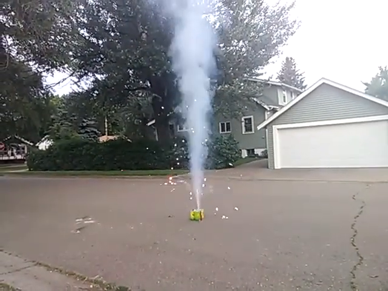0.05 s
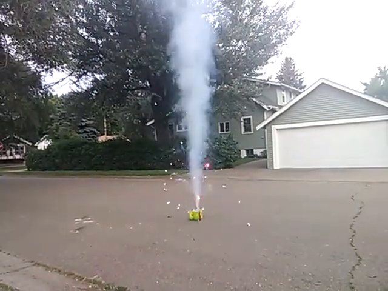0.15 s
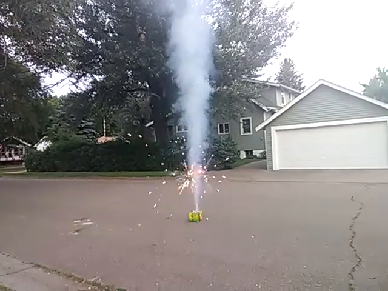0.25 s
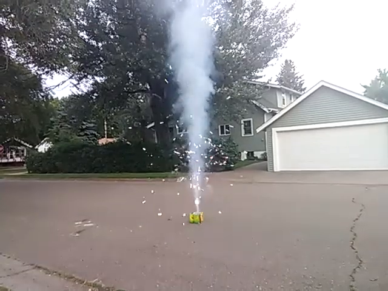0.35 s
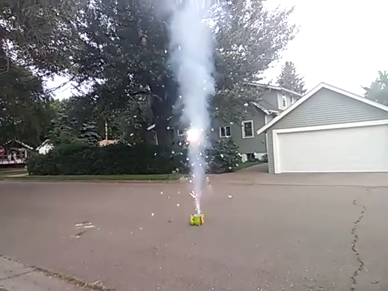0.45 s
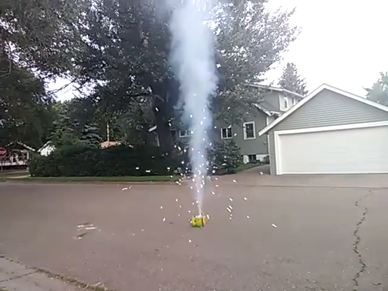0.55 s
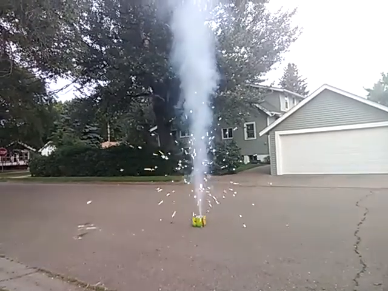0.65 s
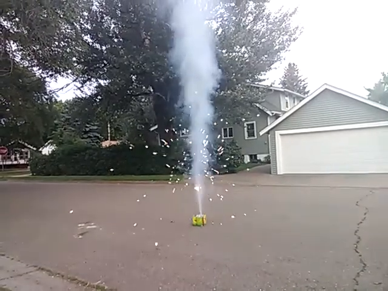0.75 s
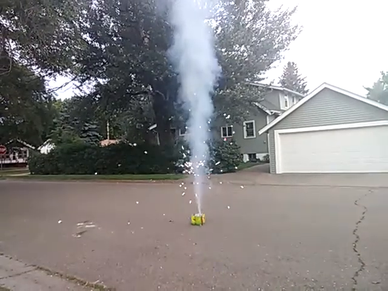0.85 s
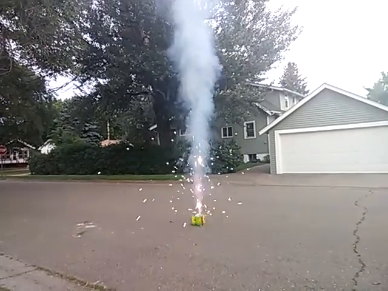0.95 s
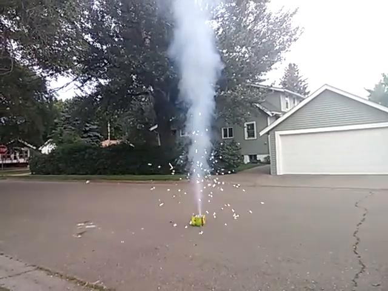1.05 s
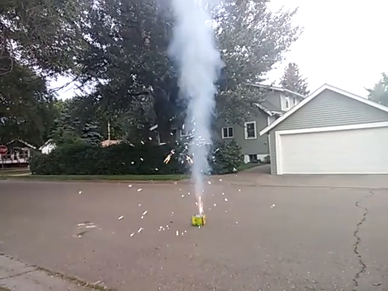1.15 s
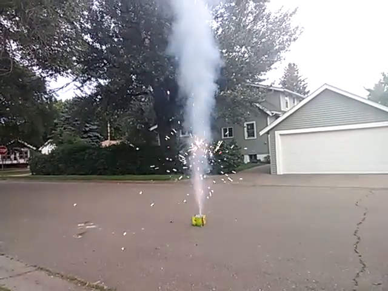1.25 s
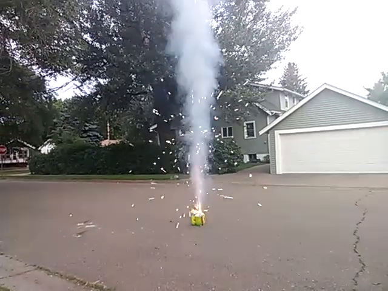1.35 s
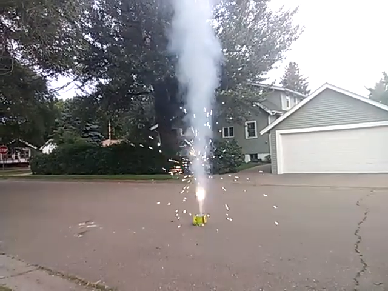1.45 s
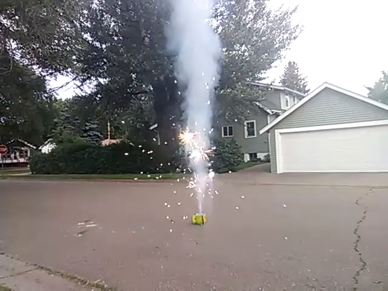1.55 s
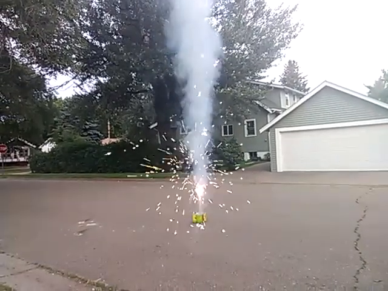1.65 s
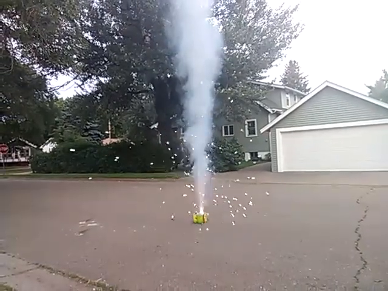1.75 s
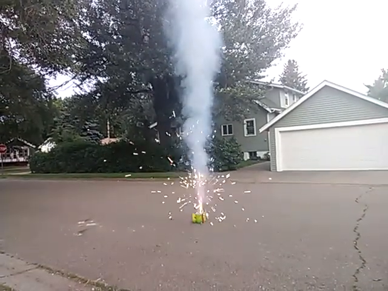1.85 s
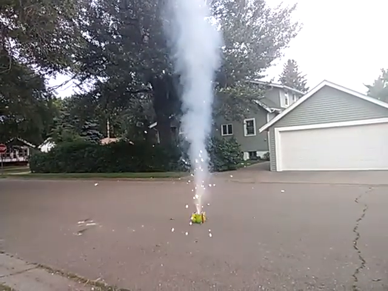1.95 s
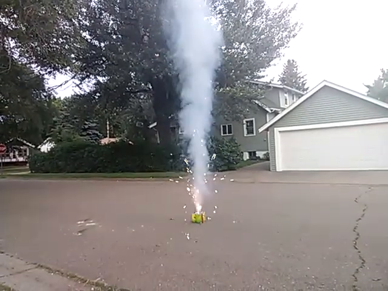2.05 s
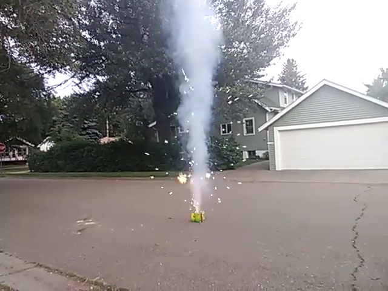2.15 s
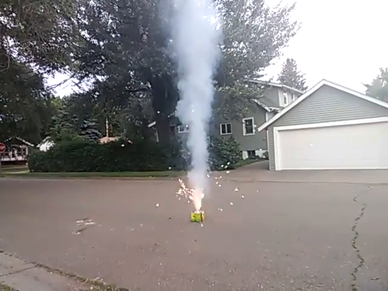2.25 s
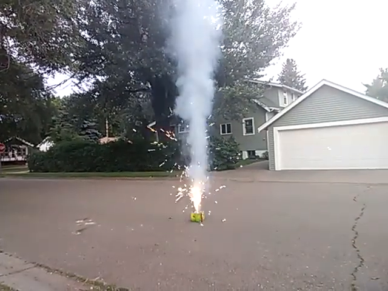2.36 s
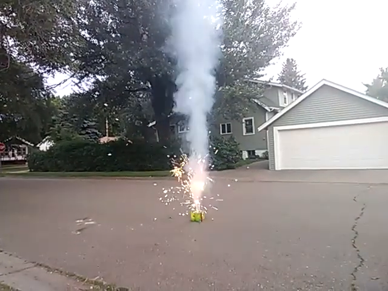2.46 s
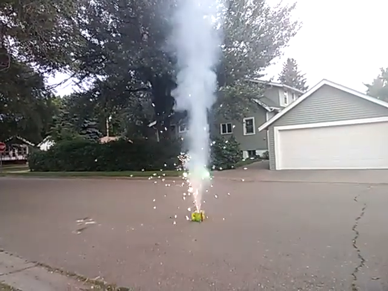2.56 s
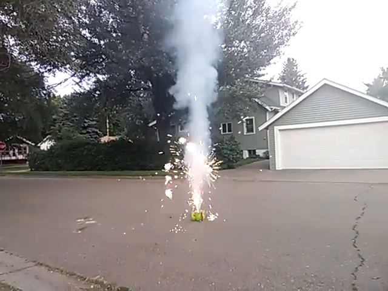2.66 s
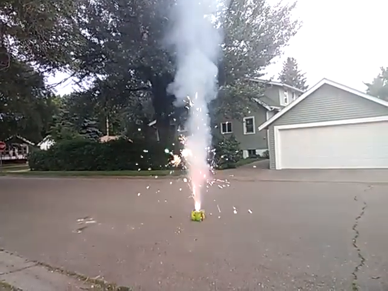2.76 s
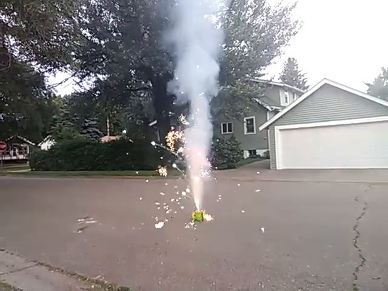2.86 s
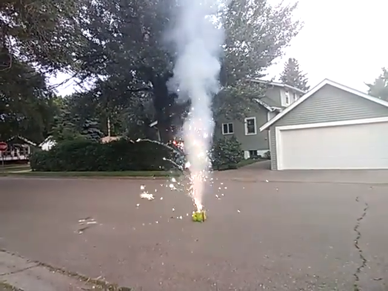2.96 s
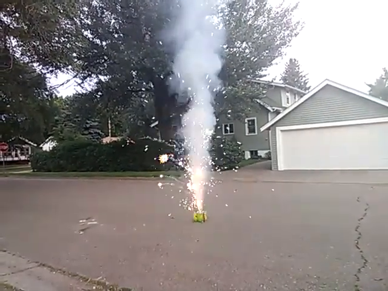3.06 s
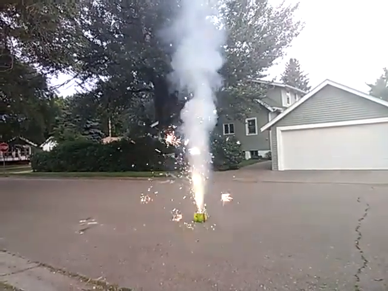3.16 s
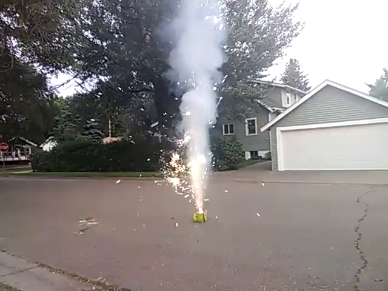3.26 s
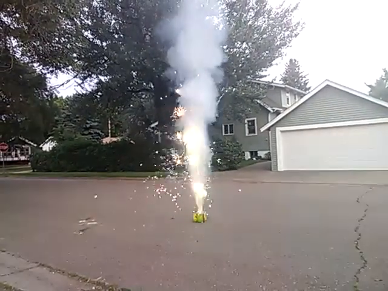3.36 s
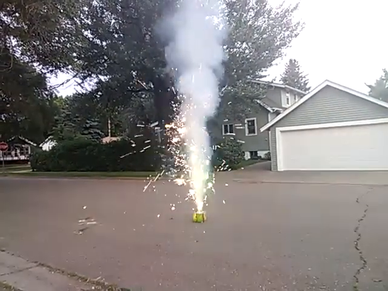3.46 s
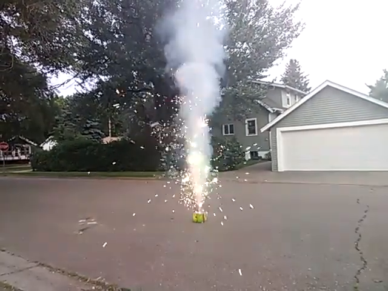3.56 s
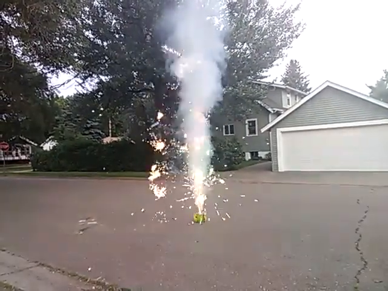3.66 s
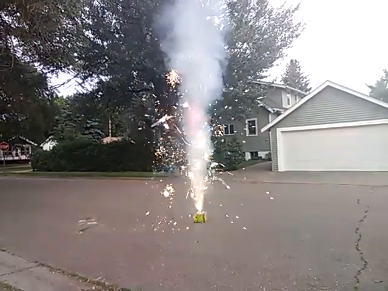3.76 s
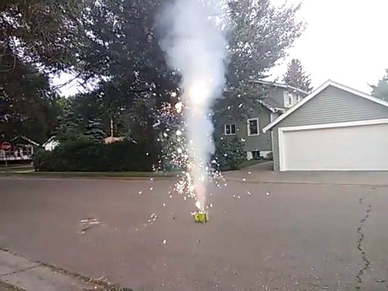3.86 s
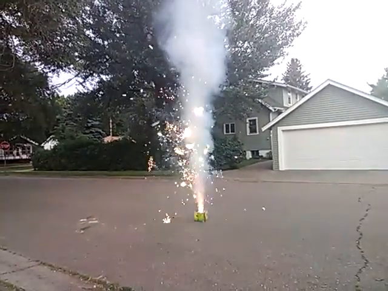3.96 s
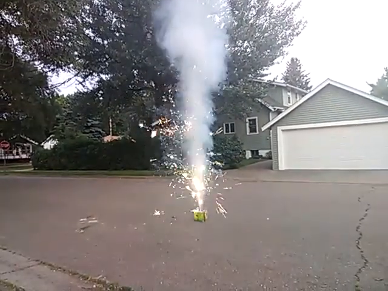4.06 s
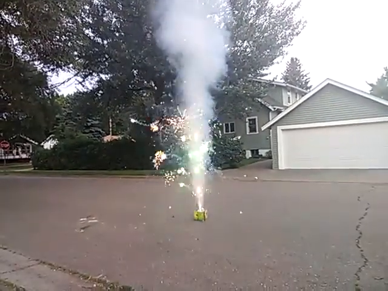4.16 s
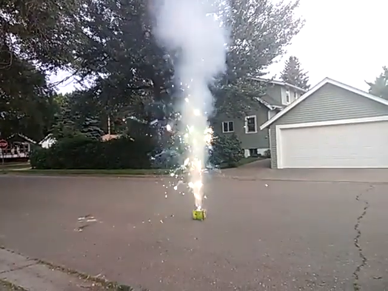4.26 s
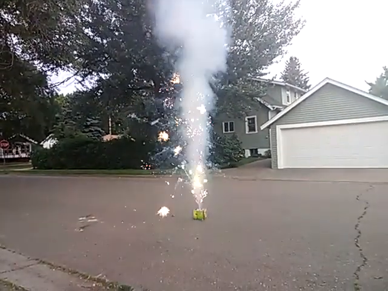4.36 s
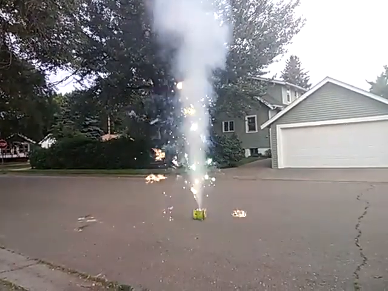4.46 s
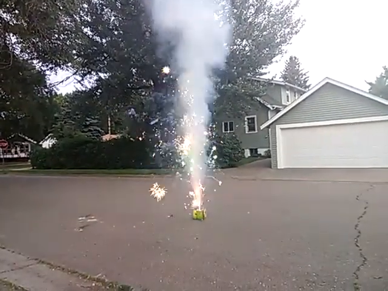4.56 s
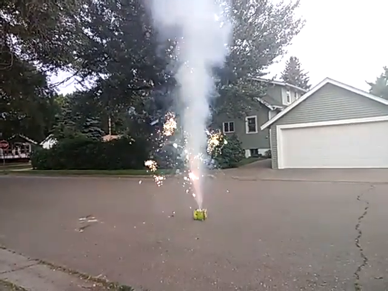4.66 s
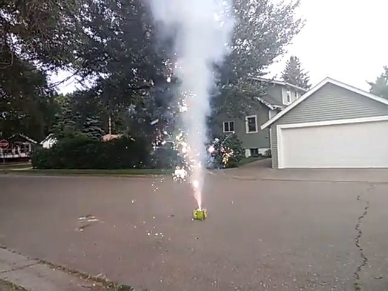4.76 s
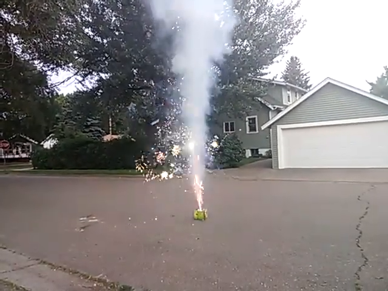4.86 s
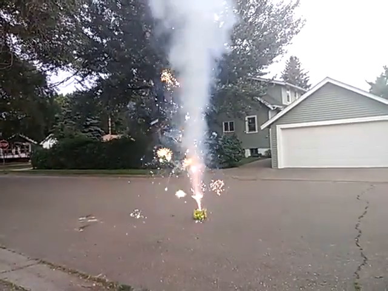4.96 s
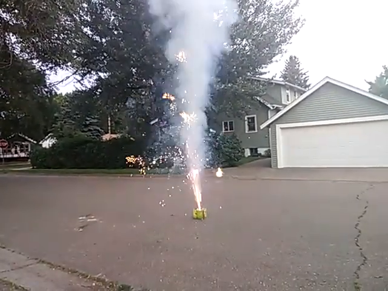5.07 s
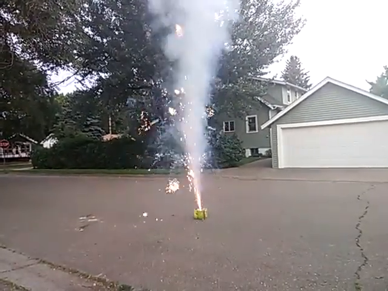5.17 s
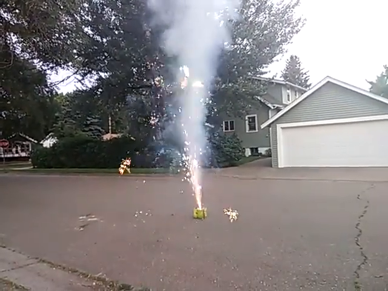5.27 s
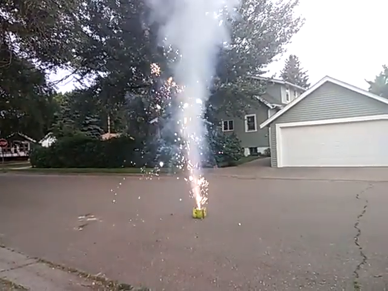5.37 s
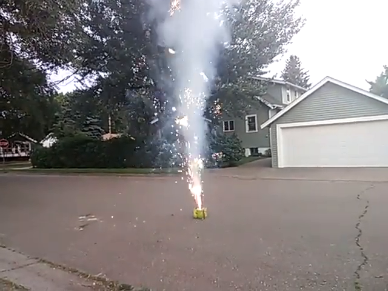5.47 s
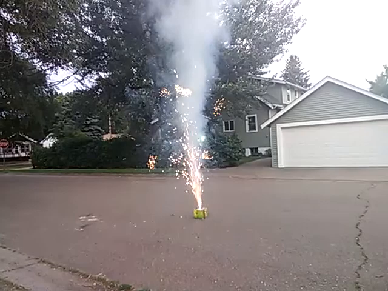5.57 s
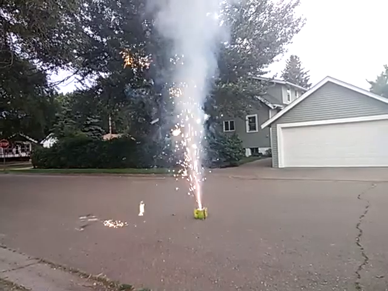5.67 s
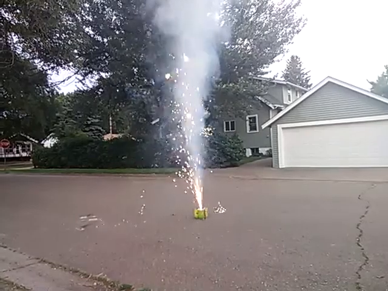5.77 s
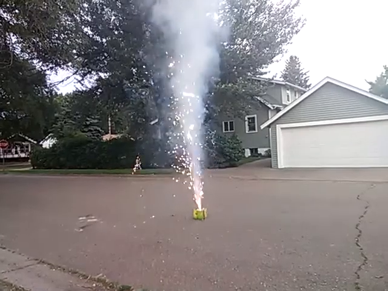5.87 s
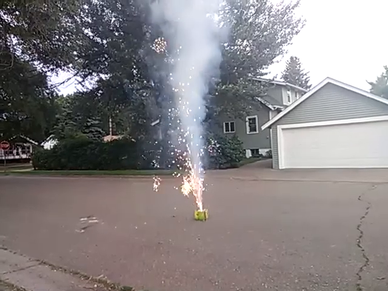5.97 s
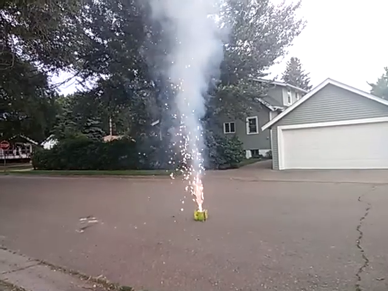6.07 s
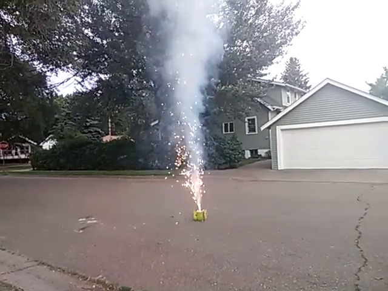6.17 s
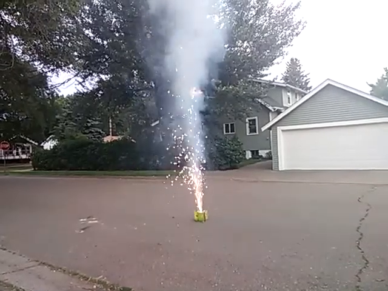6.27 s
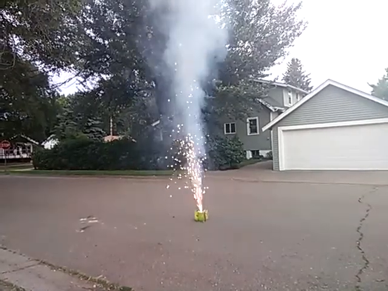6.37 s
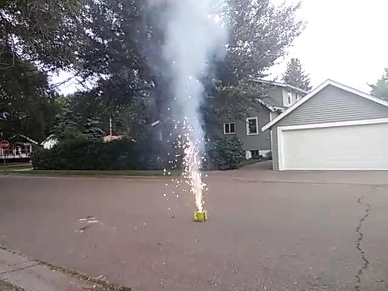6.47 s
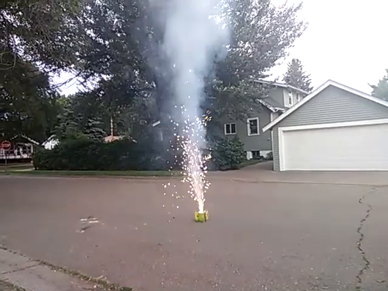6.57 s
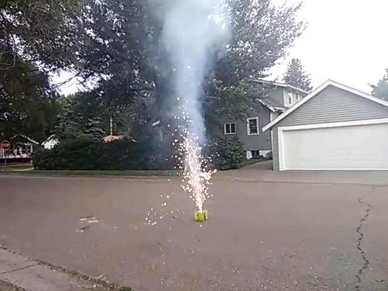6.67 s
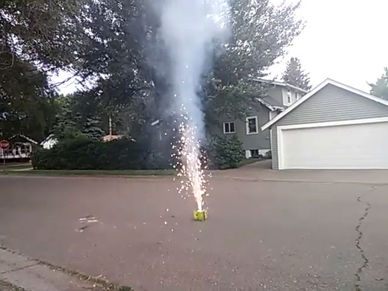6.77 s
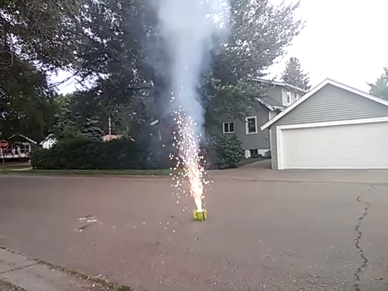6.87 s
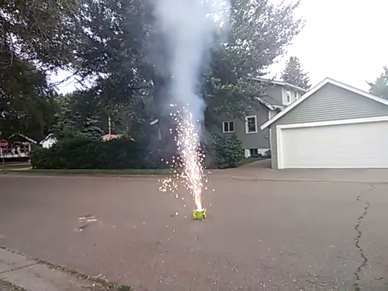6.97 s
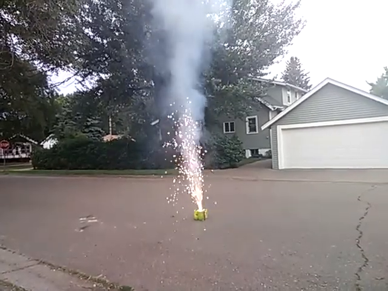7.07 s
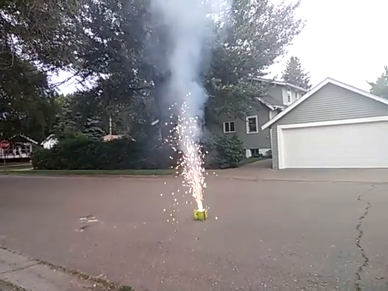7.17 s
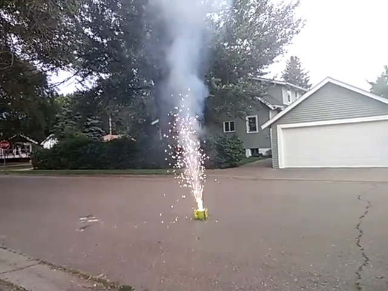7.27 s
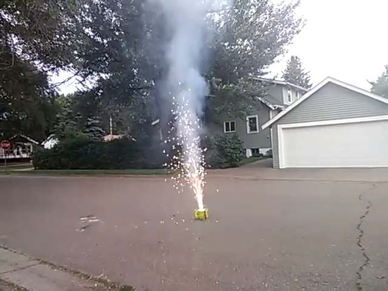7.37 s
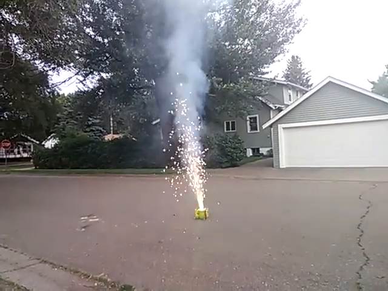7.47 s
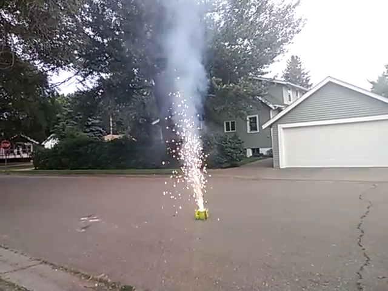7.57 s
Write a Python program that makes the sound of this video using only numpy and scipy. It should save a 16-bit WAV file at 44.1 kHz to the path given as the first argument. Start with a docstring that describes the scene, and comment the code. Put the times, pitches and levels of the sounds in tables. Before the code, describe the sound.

A street firework snaps and bangs rapidly for four seconds, drops to a fading hiss with stray sparks, then chugs back into a growing roar.

```python
"""Asphalt street, a ground fountain firework burning a few metres from the microphone.
Stars burst in quick volleys of noise that overload it; a near surface, houses and trees answer.
Smaller fragments fizz around them, and blasts of gas from the tube push the air.
Then the crackle stops: the nozzle, shaped noise, hisses and dies down with a few late sparks.
The next charge sputters in uneven chugs and catches with a growing roar."""
import sys
import numpy as np
from scipy import signal
from scipy.fft import rfft, irfft, next_fast_len
from scipy.io import wavfile
from scipy.ndimage import uniform_filter1d, map_coordinates

SR = 44100
rng = np.random.default_rng(int(sys.argv[2]) if len(sys.argv) > 2 else 0)


def waveform_to_disk(signal):
    """Save audio, clipped to [-1, 1], as 16-bit WAV at the path in sys.argv[1]."""
    frames = np.transpose(np.atleast_2d(signal))
    scaled = np.clip(frames, -1, 1) * 32767
    samples = np.round(scaled).astype(np.int16)
    wavfile.write(sys.argv[1], SR, samples)


N = 335601

# left-right likeness of the jet and of the cracks: (frequency [Hz], coherence [-1 to 1])
JET_COHERENCE = [(130, 0.99), (640, 0.9), (1400, 0.44), (3100, 1), (6800, -0.33), (15000, 0.093)]
CRACK_COHERENCE = [(60, 0.78), (150, 1), (380, 0.97), (950, 0.57), (2380, 0.15), (5980, -0.05),
                   (15000, -0.36)]
# balance of left over right for the jet and for the cracks: (frequency [Hz], level [dB])
JET_BALANCE = [(100, 1), (700, 0.5), (1500, -1.5), (2500, -0.5), (4500, 3), (6000, 1), (8000, -8),
               (14000, -4)]
CRACK_BALANCE = [(100, 0.5), (900, -0.5), (1400, 1.5), (2000, -1.5), (4500, 3.5), (6700, 1.5), (8000, -3.5),
                 (10500, -7), (14000, -0.5)]


def stars(burning, crack_db=9, echo_db=-10.5, echo_delay=.0156, ring_db=-3):
    """Each star bursts with a bright crack and a low body; a hard surface nearby repeats it."""
    # the biggest stars: (time [s], relative level [dB])
    big_stars = [(.033, -19), (.0768, -20), (.1909, -17.5), (.2573, -24.5), (.2773, -9.5), (.2816, -7.5),
                 (.353, -12.5), (.3715, -12.5), (.4061, -17), (.4179, -10), (.4383, -13.5), (.4892, -5.5),
                 (.559, -9), (.599, -6), (.665, -12), (.6746, -7), (.7131, -5.5), (.792, -9),
                 (.8277, -14.5), (.9189, -14.5), (1.003, -7), (1.0081, -11.5), (1.0746, -10.5),
                 (1.085, -6.5), (1.128, -12), (1.21, -8), (1.2396, -15.5), (1.2925, -13.5), (1.3216, -8),
                 (1.3363, -12), (1.402, -4), (1.4929, -10), (1.5346, -5.5), (1.5795, -12), (1.6622, -8),
                 (1.6993, -9), (1.7732, -12.5), (1.787, -12), (1.9199, -8), (1.929, -3), (1.9883, -6.5),
                 (2.1408, -10), (2.2071, -6.5), (2.2183, -8), (2.2849, -15), (2.304, -16.5), (2.369, -20),
                 (2.3786, -11.5), (2.4277, -8), (2.4387, -8), (2.5098, -20), (2.5563, -12), (2.7073, -9),
                 (2.7595, -2.5), (2.7835, -8), (2.854, -10), (2.8695, -17), (2.9131, -7.5), (2.9808, -18.5),
                 (3.0018, -11.5), (3.074, -4), (3.1121, -11), (3.2342, -3), (3.298, -10), (3.3505, -12),
                 (3.4714, -2), (3.538, -3.5), (3.6149, -1.5), (3.7483, -9.5), (3.7986, -6), (3.8185, -4),
                 (3.8843, -11), (3.9663, -8.5), (4.0346, -14.5), (4.1462, -13), (4.164, -4),
                 (4.2558, -10.5)]
    # spectrum of the crack: (frequency [Hz], relative density [dB per Hz])
    crack_tone = [(88, -37), (150, -7), (252, -2.5), (515, -31), (714, 0), (900, -35.5), (1130, -6.5),
                  (1670, -17), (2020, -6), (4290, 0.5), (7080, -1.5), (10600, 0.5), (13900, -6),
                  (15000, -9)]
    body_tone = [(50, -9), (120, 7.5), (300, 1.0), (500, -4.5), (750, 0.5), (1400, -2.5), (2500, -13.5)]
    body_db, body_spread_db = -8.5, 6
    crack, body = np.zeros(N), np.zeros(N)
    pops = big_stars + small_stars(burning)
    chances = rng.uniform(-1.19, 1, (len(pops), 4))
    for (s, db), (height, place, facing, weight) in zip(pops, chances):
        size = np.clip(amp((db + 12) / 4), .6, 1.2)  # big stars take longer to burst
        bounce = size * (0.0018 + 0.00036 * height)  # s; the ground path varies with the height
        low_db = body_db + body_spread_db * weight
        direct = (0, 0)
        echo = (echo_delay + 0.00062 * place, echo_db + 2 * facing)
        for delay, path_db in [direct, echo]:
            add(crack, s + delay, amp(db + path_db + crack_db) * burst(.0011 * size, bounce))
            add(body, s + delay, amp(db + path_db + low_db) * burst(0.0017 * size, bounce))
    # a crack is a handful of separate shocks, so each one has its own ragged colour
    shocks = unit((rng.random((2, N)) < 2600 / SR) * np.sign(white()))
    ragged = patchy(shocks + amp(ring_db) * white(), depth_db=3, size=24)
    bright = crack * voiced(ragged, crack_tone, CRACK_COHERENCE, CRACK_BALANCE)
    low = body * voiced(white(), body_tone, CRACK_COHERENCE, CRACK_BALANCE)
    return bright + low


def small_stars(burning, count=220, mean_gap=.022, over_volley_db=3.5, spread_db=2):
    """Lesser stars burst at uneven gaps and follow the volleys: rows of (time [s], relative level [dB])."""
    times = np.cumsum(mean_gap * rng.uniform(.55, 1.45, count))
    levels = 20 * np.log10(np.interp(times, np.arange(N) / SR, burning) + 1e-9)
    return list(zip(times, levels + over_volley_db + spread_db * rng.standard_normal(count)))


def burst(life, bounce):
    """Envelope of one burst: a brief flare, the shock, then its bounce off the asphalt."""
    t = np.arange(SR // 50) / SR - .0006  # the shock peaks 0.6 ms in

    def shock(u):
        return np.exp(np.minimum(u / (life / 3), -u / life))

    return np.hypot(shock(t), 1.02 * shock(t - bounce))


def blaze(attack=0.0042, fade_db_per_s=125):
    """How strongly the stars burn: each volley flares, holds and fades, and their powers add."""
    # volleys of crackling stars: (time [s], length [s], relative level [dB])
    volleys = [(-.03, 0.06, -18), (.279, .008, -30), (0.355, 0.18, -25.5), (0.553, .29, -20),
               (0.994, 0.014, -15.5), (1.06, 0.1, -21.5), (1.197, 0.17, -17.5), (1.385, .1, -17),
               (1.551, 0.046, -17), (1.641, 0.045, -13.5), (1.775, 0.018, -13.5), (1.86, 0.058, -24.5),
               (1.927, 0.058, -20), (2.195, 0.018, -19), (2.258, 0.017, -20), (2.408, 0.021, -19.5),
               (2.483, .13, -19.5), (2.707, 0.13, -18), (3.056, .11, -15), (3.28, 0.082, -13),
               (3.53, .17, -12), (3.75, 0.16, -17.5), (3.983, 0.034, -27), (4.14, 0.084, -17.5)]
    power = np.zeros(N)
    for s, length, db in volleys:
        power += (amp(db) * swell(s, length, attack, fade_db_per_s)) ** 2
    return np.sqrt(power)


def crackle(burning, level_db=-4, patchy_db=4.0, snaps_db=-1, snap_rate=200, snap_life=0.00054):
    """Small fragments fizz and snap around the stars and burn out with them."""
    # spectrum: (frequency [Hz], relative density [dB per Hz])
    fizz_tone = [(120, -33), (200, 0), (512, -5.5), (1380, -6.5), (1630, -10), (2090, -3), (2950, 1.5),
                 (3170, 2), (4980, 4.5), (7020, 2), (9720, 0.5), (13000, -3), (15000, -32)]
    snaps = grains(snap_rate, spread_db=5.5, life=snap_life)
    fizz = patchy(white(), patchy_db) + amp(snaps_db) * snaps
    return burning * amp(level_db) * voiced(fizz, fizz_tone, CRACK_COHERENCE, CRACK_BALANCE)


def grains(rate, spread_db, life):
    """Tiny snaps of burning metal powder at random times, mostly small."""
    strengths_db = spread_db * np.minimum(rng.exponential(size=N), 2.5)
    sizes = (rng.random(N) < rate / SR) * amp(strengths_db)
    shape = np.exp(-np.arange(SR // 100) / SR / life)
    power = signal.fftconvolve(sizes ** 2, shape ** 2)[:N]
    return unit(np.sqrt(np.abs(power)) * white())


def sparks(level_db=0, sizzle_db=-17, sizzle_life=0.024):
    """A few stragglers snap thinly after the volleys and sizzle out."""
    # small late sparks: (time [s], relative level [dB])
    stragglers = [(4.536, -21.5), (4.703, -27), (4.734, -26), (6.093, -21.5), (6.285, -31.5),
                  (6.513, -21.5), (6.8872, -17), (6.921, -17.5)]
    thin_tone = [(500, -6.5), (3000, -8), (9000, -0.5), (14000, 5.5)]
    snaps, t = np.zeros(N), np.arange(SR // 8) / SR
    for s, db in stragglers:
        add(snaps, s, amp(db + level_db - 3) * burst(.0011, .001))
        add(snaps, s, amp(db + sizzle_db) * np.exp(-t / sizzle_life))
    return snaps * voiced(white(), thin_tone, CRACK_COHERENCE, CRACK_BALANCE)


def nozzle(roar, rush, hiss, roar_db=0, rush_db=0, hiss_db=2):
    """The gas jet: a turbulent roar, a rush above it and a gritty hiss, all fluttering with the flow."""
    # spectra of the three bands: (frequency [Hz], relative density [dB per Hz])
    roar_tone = [(90, -16), (180, -8.5), (270, -1), (400, -3.5), (520, -7), (740, -2.5), (1050, -5),
                 (1350, -16.5), (1800, -37), (3000, -57)]
    rush_tone = [(1200, -56), (1900, -11), (2550, 1.5), (3100, -4), (4000, -0.5), (4800, -5), (5500, -20),
                 (7000, -30.5)]
    hiss_tone = [(4000, -18.5), (6200, -10), (7150, -6), (8400, -3), (9600, -7.5), (10600, -5.5),
                 (12500, -11.5), (14500, -21.5)]
    flutter = 0.83 * wobble(28)  # dB
    roar_gain = roar * amp(roar_db + flutter + 2.5 * wobble(60))
    jet = roar_gain * voiced(white(), roar_tone, JET_COHERENCE, JET_BALANCE)
    streaks = patchy(white(), depth_db=3.0)
    jet += rush * amp(rush_db + flutter) * voiced(streaks, rush_tone, JET_COHERENCE, JET_BALANCE)
    grit = white() + amp(-4.0) * grains(rate=460, spread_db=2.5, life=0.00082)
    return jet + hiss * amp(hiss_db + flutter) * voiced(grit, hiss_tone, JET_COHERENCE, JET_BALANCE)


def jet_flow():
    """Gains of roar, rush, hiss and rumble: each burn catches, holds or builds, and fades to a smoulder."""
    # burns of the nozzle: (time [s], length [s], attack [s], growth [dB/s],
    # then relative levels of roar [dB], rush [dB], hiss [dB], rumble [dB])
    burns = [(0, 4.83, .02, 0.5, -60, -58, -50, -45), (4.853, 0.92, 0.1, 1.5, -43, -47, -37, -46),
             (6.51, 0.17, 0.0087, 0, -56, -70, -53, -47.5), (6.91, 1, 0.005, 0, -37.5, -41.5, -44.5, -58),
             (7.21, .4, 0.021, 19.5, -40.5, -42, -49, -68)]
    # fade after a burn: (roar [dB/s], rush [dB/s], hiss [dB/s], rumble [dB/s])
    fades = [26.5, 45, 60, 41.7]
    # relative level of the smoulder under the burns: (roar [dB], rush [dB], hiss [dB], rumble [dB])
    smoulder = [-74, -61, -54, -58]
    power = np.outer(amp(smoulder) ** 2, np.ones(N))
    for s, length, attack, growth, *levels in burns:
        built_db = growth * np.clip(np.arange(N) / SR - s, 0, length)
        for band, (db, fade) in enumerate(zip(levels, fades)):
            power[band] += (amp(db + built_db) * swell(s, length, attack, fade)) ** 2
    return np.sqrt(power)


def sputter(puffs, level_db=-1.0, chug_hz=150, ragged=.4, breathy_db=-5):
    """The fresh charge coughs out puffs, each a short run of uneven chugs with breathy noise."""
    tone = [(50, -21), (110, -1), (200, 4.5), (300, 2.5), (450, -6.0), (800, -11), (1600, -34),
            (3000, -23.0), (6000, -48)]
    cycles = np.cumsum(chug_hz * np.exp(ragged * wobble(120))) / SR
    ticks = np.diff(np.floor(cycles), prepend=0)  # one click at each whole cycle
    chugs = unit(ticks * amp(3.3 * wobble(74)))
    cough = chugs * [[1], [0]] + amp(breathy_db) * white()
    return puffs * amp(level_db) * voiced(cough, tone, JET_COHERENCE, JET_BALANCE)


def puffing(attack=.0012, fade_db_per_s=480):
    """Gas flow of the puffs with which the fresh charge catches."""
    # puffs: (time [s], relative level [dB], length [s])
    coughs = [(6.464, -40, 0.063), (6.567, -40, 0.0087), (6.628, -47, 0.011), (6.684, -31.5, 0.033),
              (6.776, -35, 0.0072), (6.798, -30.5, 0.034), (6.848, -36.5, 0.046), (6.913, -29, 0.049),
              (7.126, -30, 0.02), (7.16, -30, 0.016)]
    return sum(amp(db) * swell(s, length, attack, fade_db_per_s) for s, db, length in coughs)


def tube(rumble, burning, puffs, volley_db=-19, puff_db=-12):
    """The charge burns in lumps, harder with volleys and puffs; a gas blast is a heavy push and rebound."""
    # spectrum of the rumble: (frequency [Hz], relative density [dB per Hz])
    rumble_tone = [(20, -35), (40, -11), (65, 4.5), (100, -2.5), (160, -6), (300, -23.5), (800, -27.5)]
    # blasts of gas from the tube: (time [s], relative level [dB], period [s])
    blasts = [(1.741, -2.5, 0.017), (1.924, -6.5, 0.016), (2.141, -17, 0.011), (3.2822, -1.5, 0.015),
              (3.547, -1.5, 0.02), (3.59, -13, 0.021), (4.648, -31, 0.01), (5.078, -26, 0.014)]
    level = np.sqrt(rumble ** 2 + (amp(volley_db) * burning) ** 2 + (amp(puff_db) * puffs) ** 2)
    lumps = 2.5 * wobble(14)  # dB
    low = level * amp(lumps) * voiced(white(), rumble_tone, JET_COHERENCE, JET_BALANCE)
    t = np.arange(SR // 8) / SR
    for s, db, period in blasts:
        push = np.cos(2 * np.pi * t / period)
        envelope = np.exp(-t / (0.36 * period)) * (1 - np.exp(-t / 0.00008))
        add(low, s, amp(db) * push * envelope)
    return low


def street(x, wet_db=-9.5, count=4):
    """Houses and trees scatter the sound back; slices of 1/14 s take turns through different noise tails."""
    # decay of the street: (frequency [Hz], time to fall 60 dB [s])
    decay = [(200, 0.35), (1400, 0.25), (4000, 0.26), (12000, 0.34)]
    wet_tone = [(150, -8.0), (1200, 2.5), (4000, 1.5), (9000, 1.0), (14000, -2.5)]
    hz, t, z = signal.stft(rng.standard_normal((count, 2, SR // 2)), SR, nperseg=256)
    build = 1 - np.exp(-t / .008)
    fall = amp(-60 * t / along(decay, hz)[:, None])
    tails = signal.istft(z * build * fall, SR, nperseg=256)[1]
    turn = np.arange(N) // (SR // 14) % count
    wet = np.zeros((2, N))
    for k, tail in enumerate(tails):
        wet += signal.fftconvolve(x * (turn == k), tail / np.linalg.norm(tail[0]), axes=1)[:, :N]
    return amp(wet_db) * filtered(wet, lambda f: amp(along(wet_tone, f)))


def swell(s, length, attack, fade_db_per_s):
    """Attack, hold and fade of something that catches at s seconds."""
    t = np.maximum(np.arange(N) / SR - s, 0)
    return (1 - np.exp(-t / attack)) * amp(-fade_db_per_s * np.maximum(t - length, 0))


def patchy(pair, depth_db, size=5):
    """Scattered paths add and cancel, leaving drifting patches in the spectrum, size bins wide."""
    z = signal.stft(pair, nperseg=1024)[2]
    field = uniform_filter1d(rng.standard_normal(z.shape[1:]), size=size, axis=0)
    field = uniform_filter1d(field, size=4, axis=1)
    return signal.istft(z * amp(depth_db * unit(field)), nperseg=1024)[1][:, :N]


def voiced(pair, tone, coherence, balance):
    """Two unrelated signals become a coloured stereo sound of rms 1."""
    def mid_side(hz):
        angle = np.arccos(np.clip(along(coherence, hz), -1, 1)) / 2
        return amp(along(tone, hz)) * [np.cos(angle), np.sin(angle)]

    def left_right(hz):
        return amp(np.outer([.5, -.5], along(balance, hz)))

    mid, side = filtered(pair, mid_side)
    return unit(filtered(np.array([mid + side, mid - side]), left_right))


def white():
    """Two unrelated noises."""
    return rng.standard_normal((2, N))


def wobble(rate):
    """A smooth random curve, rate knots a second."""
    knots = rng.standard_normal(int(N * rate / SR) + 4)
    return map_coordinates(knots, [np.arange(N) * rate / SR])


def filtered(x, response):
    """x times a response of frequency."""
    m = next_fast_len(N + SR // 2)
    return irfft(rfft(x, m) * response(np.fft.rfftfreq(m, 1 / SR)), m)[..., :N]


def add(track, s, sound):
    """Mix a sound into a track at s seconds."""
    part = track[..., max(0, round(s * SR)):][..., :sound.shape[-1]]
    part += sound[..., :part.shape[-1]]


def along(points, hz):
    """Interpolate (frequency, value) points on a log frequency axis."""
    f, v = np.transpose(points)
    return np.interp(np.log(hz + 1), np.log(f + 1), v)


def amp(db):
    """Decibels to gain."""
    return 10 ** (np.asarray(db) / 20)


def unit(x):
    """x at rms 1."""
    return x / np.sqrt(np.mean(x ** 2) + 1e-20)


def scene():
    """Bursts with their echoes, over the burning fountain."""
    burning, puffs = blaze(), puffing()
    roar, rush, hiss, rumble = jet_flow()
    bursts = stars(burning) + sparks()
    fountain = crackle(burning) + nozzle(roar, rush, hiss)
    charge = tube(rumble, burning, puffs) + sputter(puffs)
    return bursts + street(bursts) + fountain + charge


def record(dry, top=0.65, hardness=5, low_hz=40, top_hz=14300):
    """The loudest cracks saturate the microphone; deep bass and the highest treble are lost."""
    clipped = dry / (1 + np.abs(dry / top) ** hardness) ** (1 / hardness)
    thinned = signal.sosfilt(signal.butter(4, low_hz, "high", fs=SR, output="sos"), clipped)
    return filtered(thinned, lambda hz: 1 / (1 + (hz / top_hz) ** 120))


dry = scene()
out = record(dry)
waveform_to_disk(out)
```